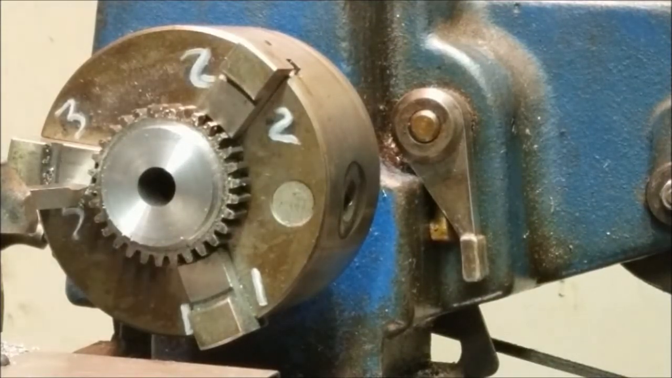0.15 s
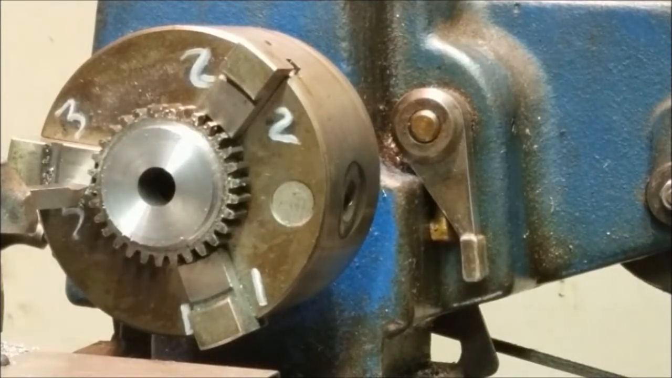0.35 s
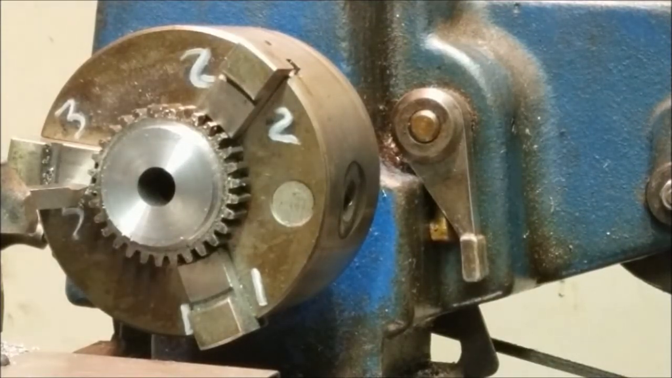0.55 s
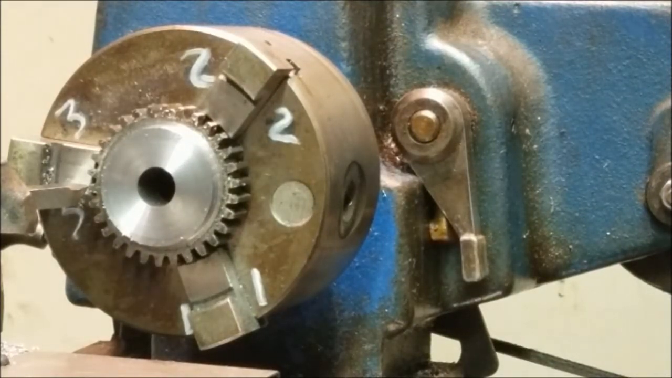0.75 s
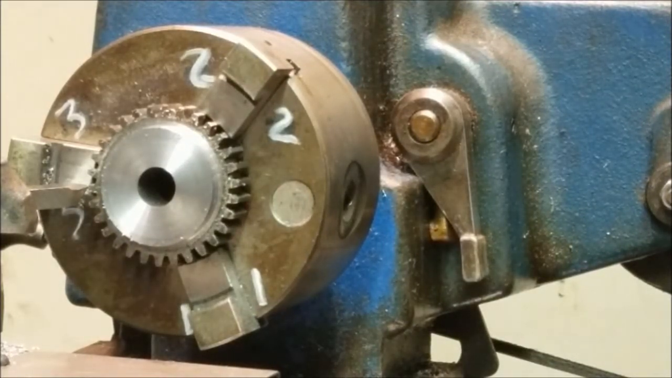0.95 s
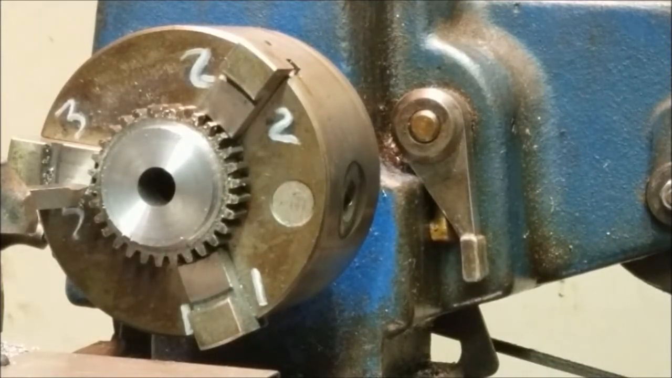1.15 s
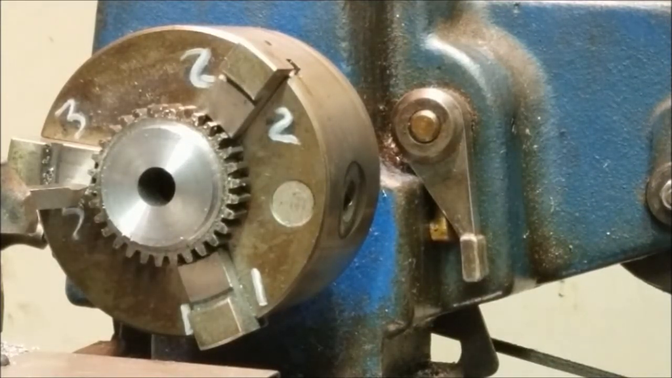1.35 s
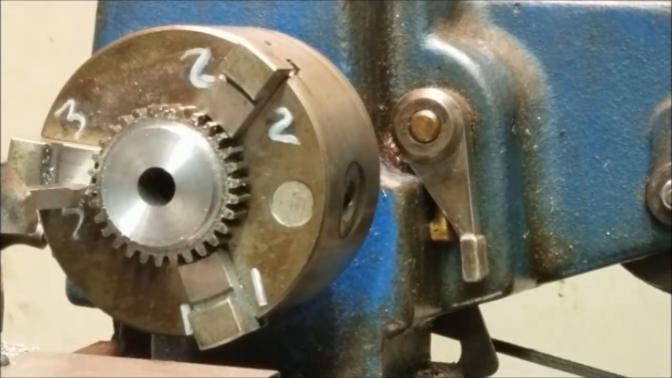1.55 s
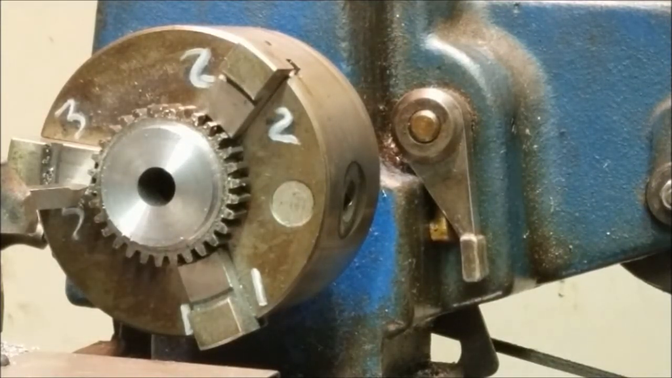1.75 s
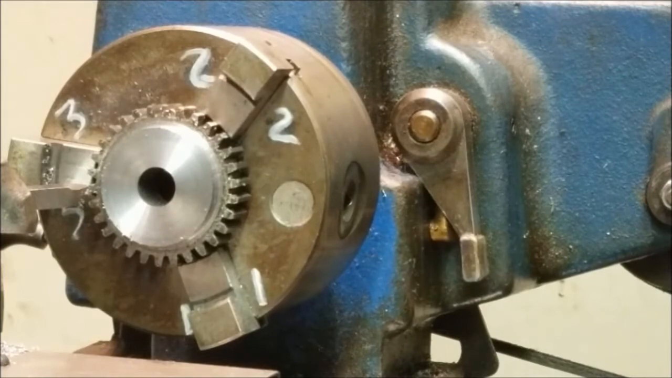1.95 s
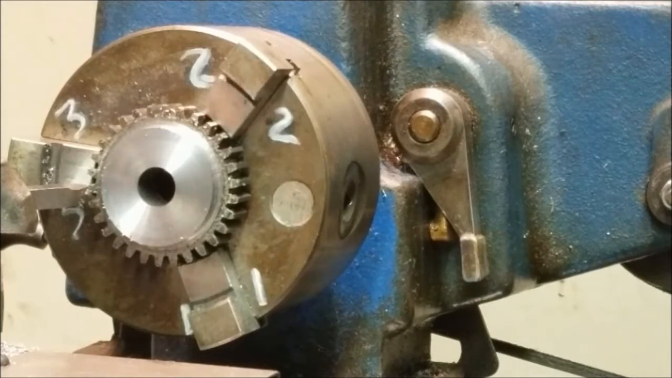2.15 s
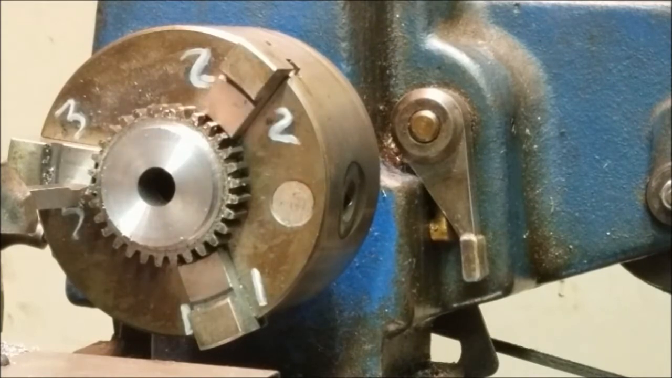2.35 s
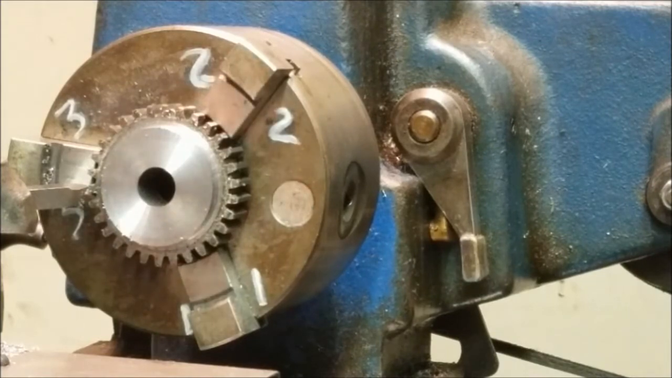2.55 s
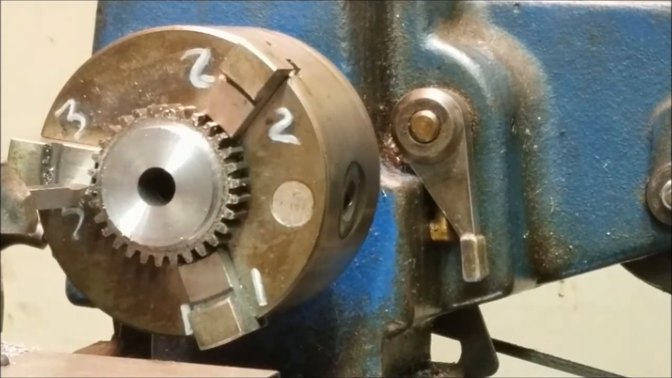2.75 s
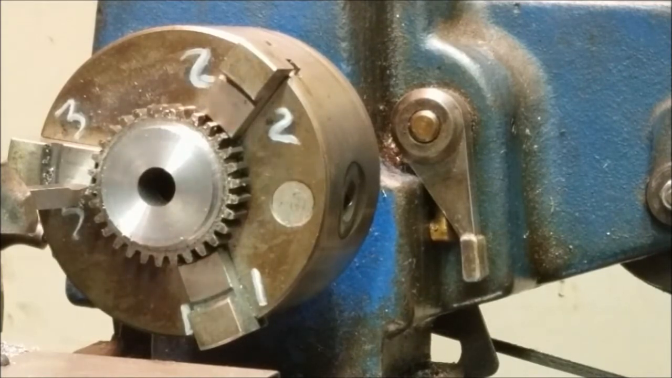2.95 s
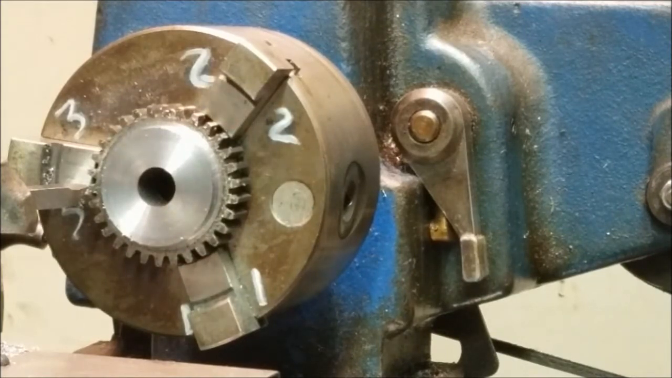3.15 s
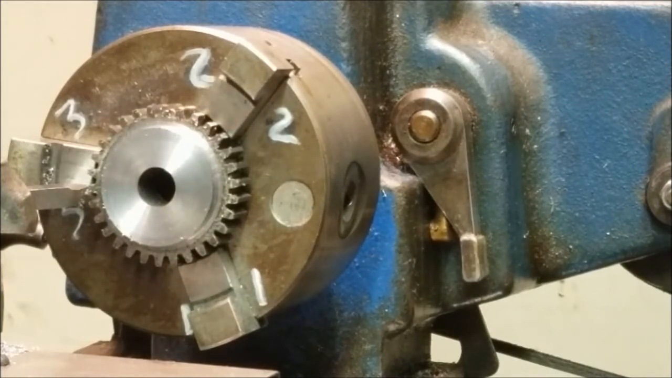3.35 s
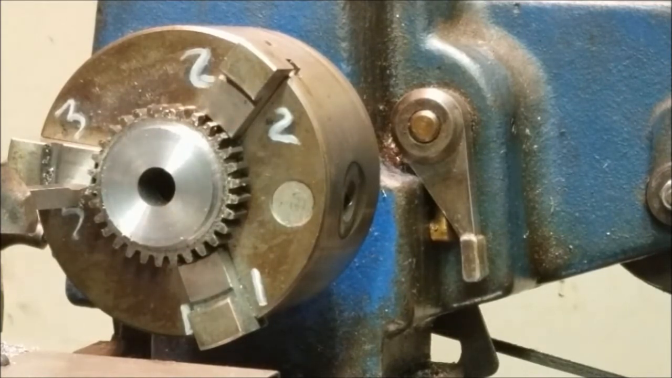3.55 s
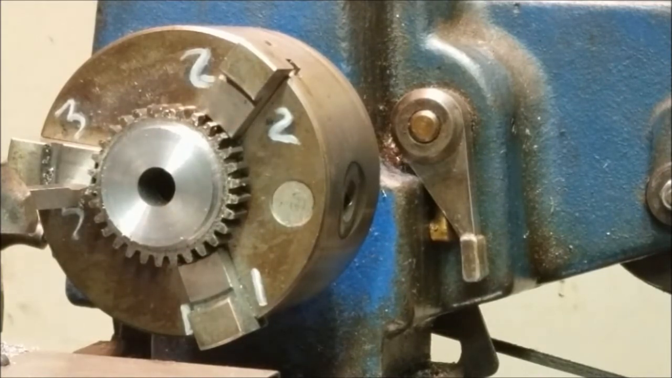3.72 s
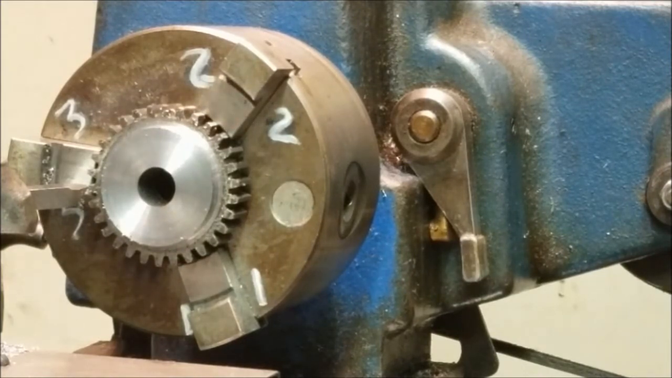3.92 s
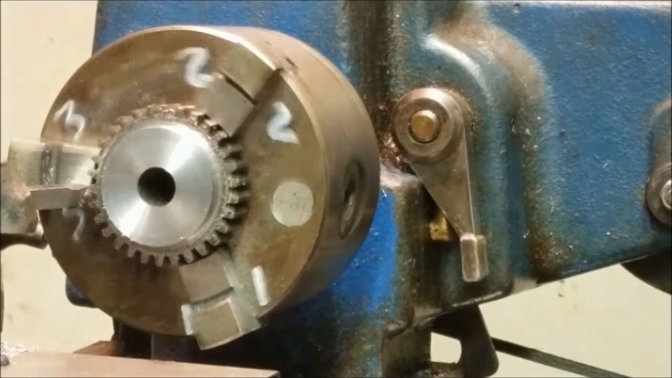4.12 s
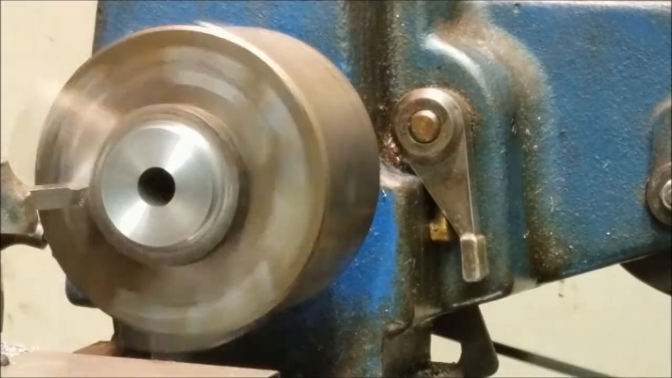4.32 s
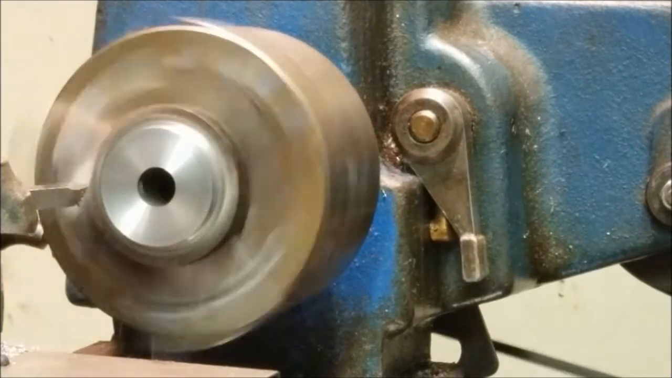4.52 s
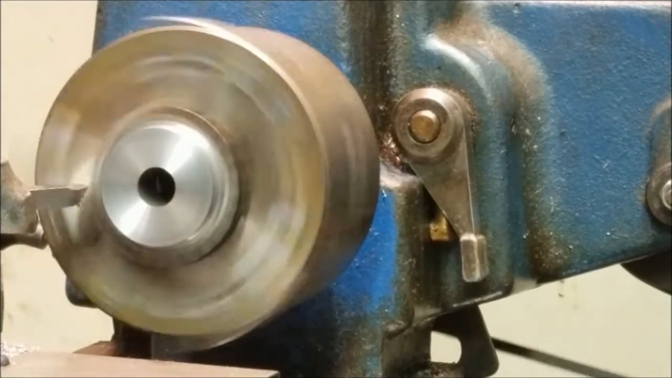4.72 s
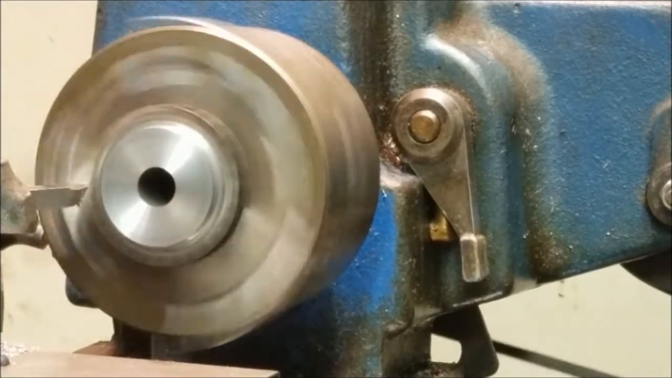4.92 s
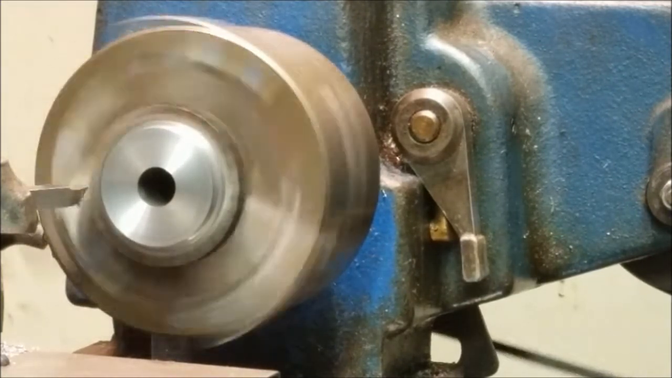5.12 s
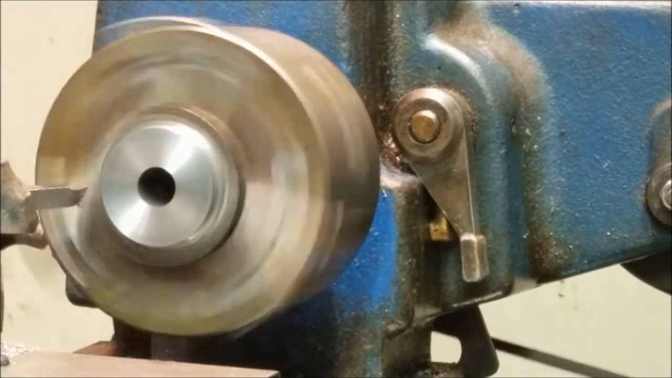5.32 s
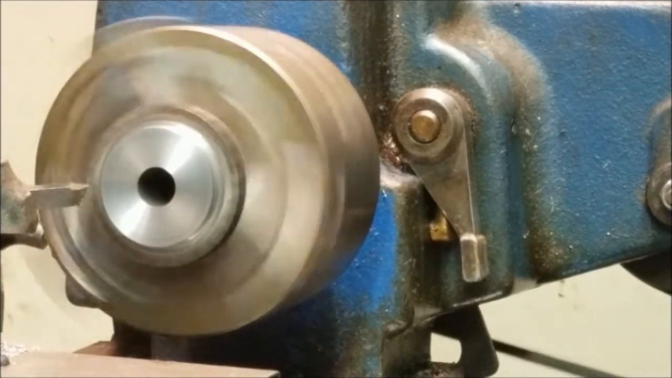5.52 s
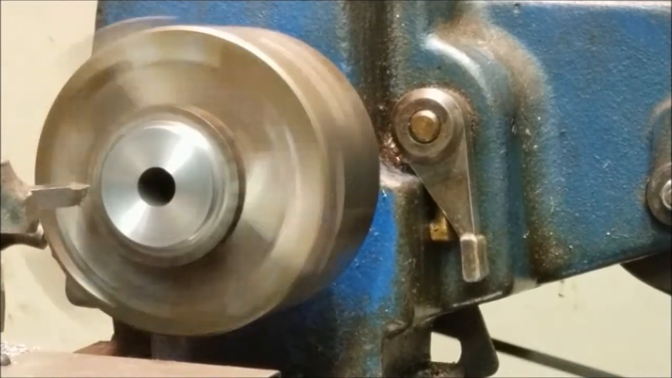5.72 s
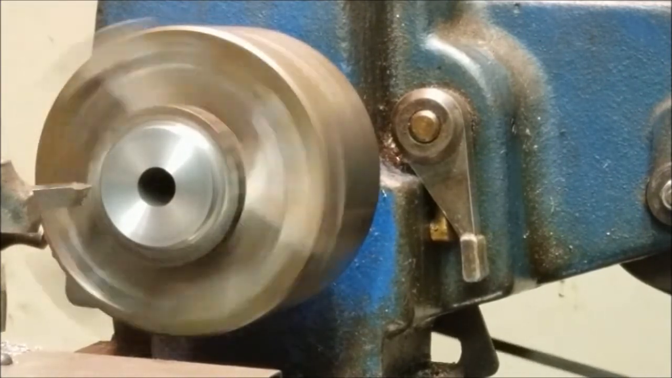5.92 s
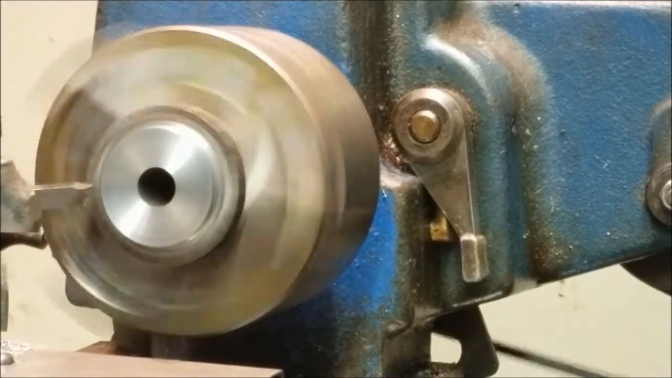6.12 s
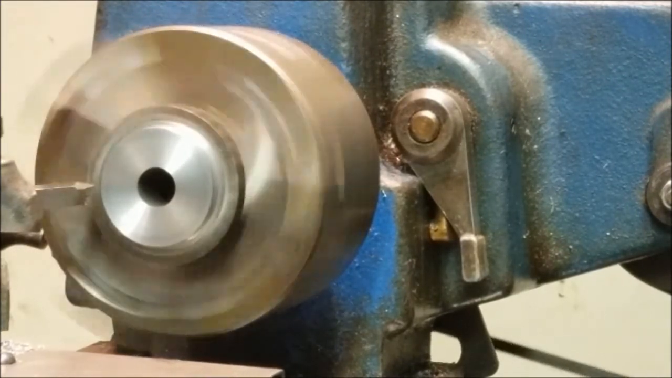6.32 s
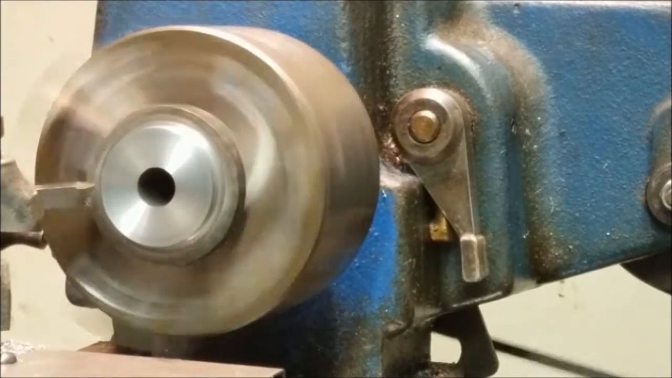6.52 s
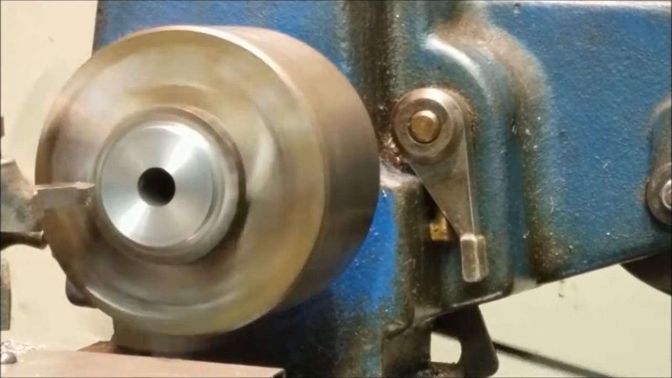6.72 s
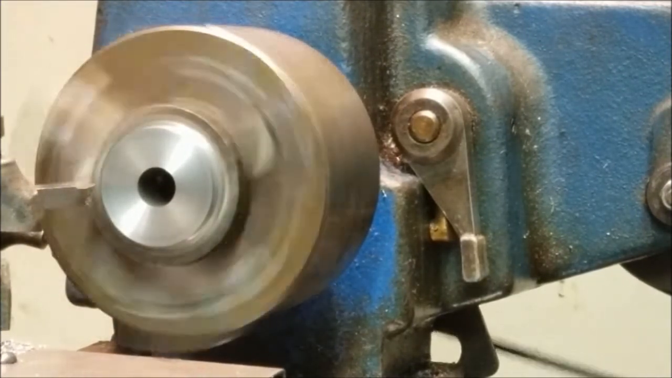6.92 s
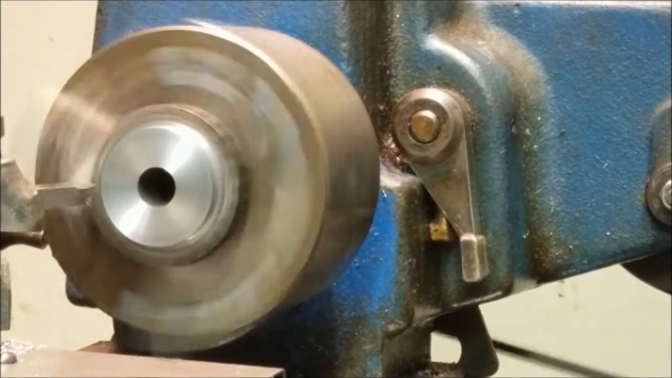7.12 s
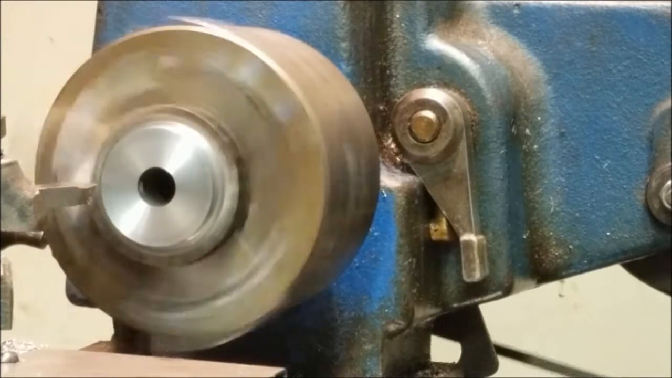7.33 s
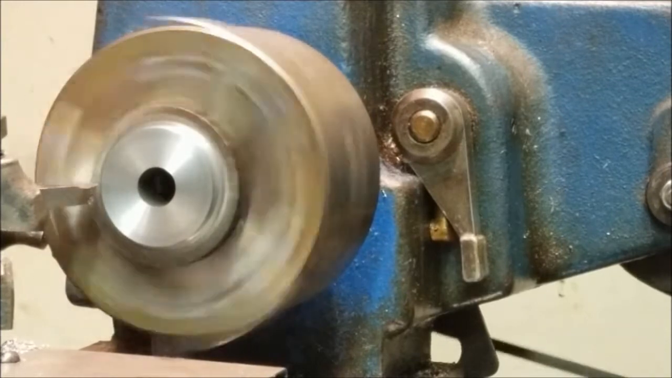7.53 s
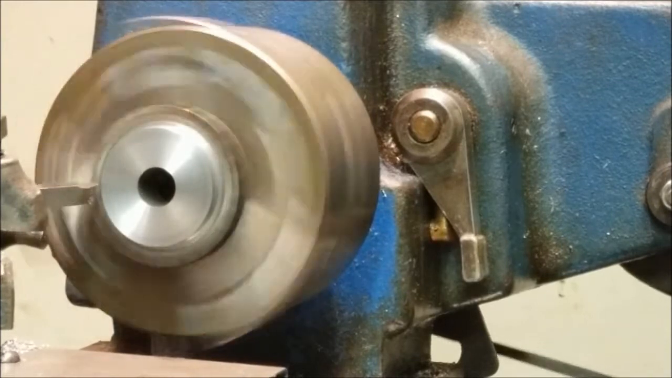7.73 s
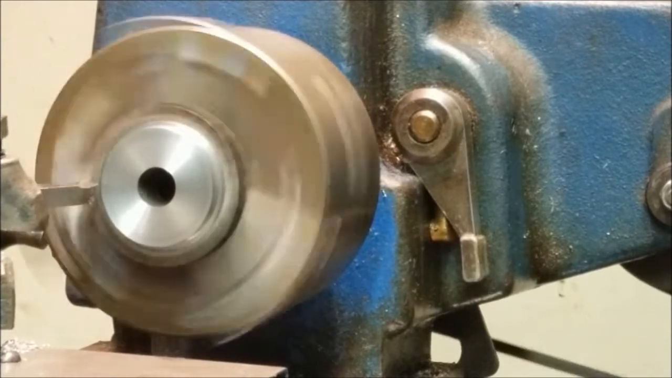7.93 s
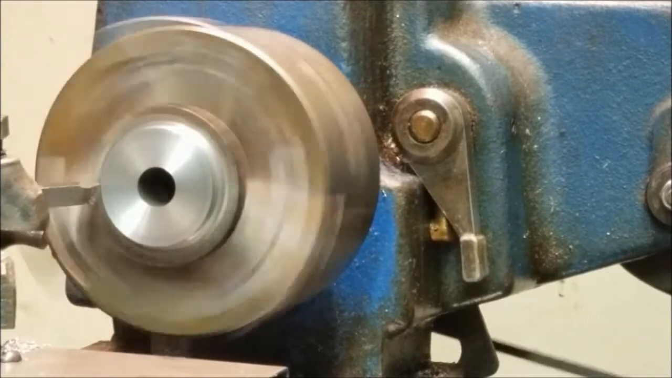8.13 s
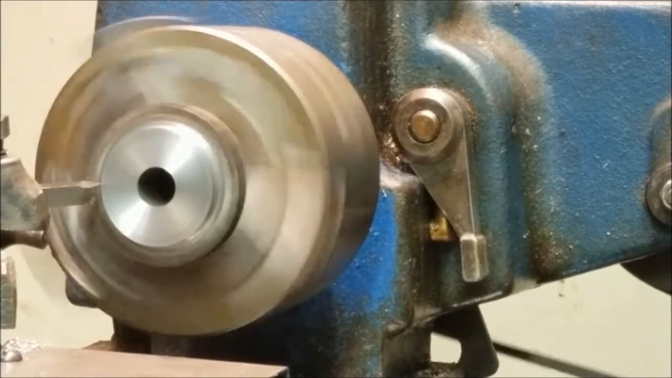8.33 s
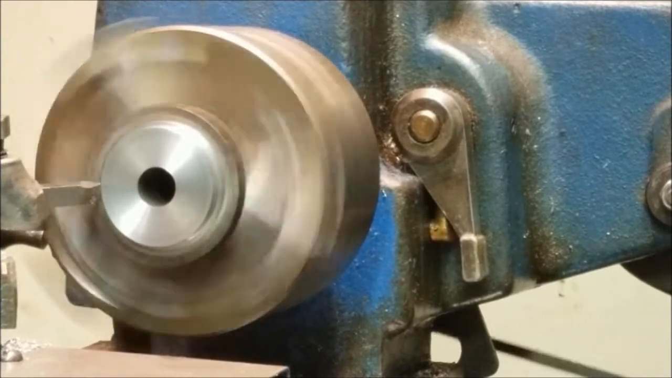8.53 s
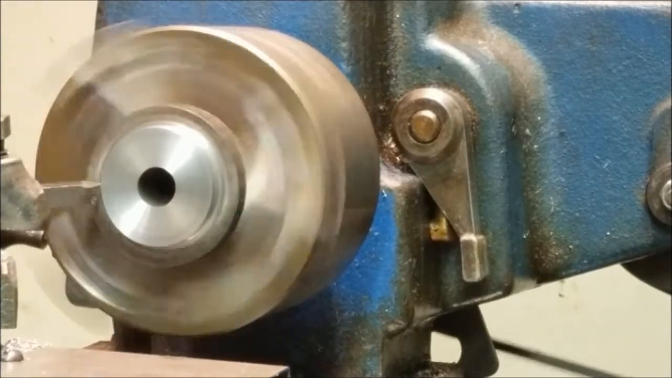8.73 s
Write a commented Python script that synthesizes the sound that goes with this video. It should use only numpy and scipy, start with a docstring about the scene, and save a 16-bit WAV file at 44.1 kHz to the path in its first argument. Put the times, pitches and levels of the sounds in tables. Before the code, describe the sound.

Faint metallic rubs and lever clinks in a quiet workshop, then a hard switch snap and a lathe motor growls up into a strong steady low hum.

```python
"""Faint rubs, scrapes and clinks first: the controls of a metal lathe are handled, close by in a small workshop.
The switch snaps, the induction motor growls up to speed and its starting switch clicks out.
It runs on: strong hum at twice mains frequency, slot whine, belt rumble and hiss, light uneven ticks.
Tonal parts are sums of wandering sines; rough parts are coloured noise under timed envelopes;
the lever rings as a bank of resonances."""
import sys
import numpy as np
from scipy import signal
from scipy.fft import rfft, irfft, next_fast_len
from scipy.io import wavfile
from scipy.ndimage import uniform_filter1d, map_coordinates

SR = 44100
rng = np.random.default_rng(int(sys.argv[2]) if len(sys.argv) > 2 else 0)


def generate_wav(sig):
    """Save sig (samples, or channels by samples) to the path in sys.argv[1] as 16-bit PCM at SR."""
    pcm = np.round(np.clip(np.atleast_2d(sig).T, -1, 1) * 32767).astype(np.int16)
    wavfile.write(sys.argv[1], SR, pcm)


N = 391166

# All table levels are relative; spectra are density/dB (per Hz), scaled to rms 1 before use.
# quiet workshop spectrum: f/Hz, density/dB
QUIET_SPECTRUM = [(13, -35.5), (22, -6.5), (102, -1.5), (192, -14), (260, -24), (298, -17), (333, -28),
                  (758, -27.5), (823, -25), (1020, -30), (1870, -29), (2400, -33.5), (3240, -36),
                  (3620, -42), (15500, -38.5)]
# electrical hum in the room: f/Hz, level/dB
ROOM_TONES = [(120, -76.5), (840, -87.5), (1200, -90), (1922, -93.5), (2040, -91.5)]
# left-right likeness of noise: f/Hz, correlation/1
LIKENESS = [(100, 0.96), (300, 1), (700, 0.9), (1500, 0.74), (3000, 0.88), (6000, 0.9), (12000, 0.92)]
# workshop decay: f/Hz, t60/s
ROOM_T60 = [(200, 0.73), (1000, 0.38), (4000, 0.34), (8000, .3), (15000, 0.12)]

# light rubs of sliding parts: t/s, length/s, level/dB
RUBS = [(0.323, 0.18, -65.5), (0.569, .1, -64.5), (1.09, 0.1, -68), (1.22, 0.092, -67), (1.823, .09, -69),
        (1.96, 0.043, -70.5), (3.548, 0.22, -85.5)]
# soft knocks as the hand takes hold: t/s, level/dB
KNOCKS = [(.338, -64), (.378, -64.5)]
# short lever scrapes: t/s, length/s, level/dB, dull body re scrape/dB
SCRAPES = [(1.316, 0.04, -48, -30), (1.358, 0.032, -56, -21), (1.719, 0.063, -57, -1),
           (2.353, 0.068, -56.5, -10.5), (2.416, 0.083, -61.5, -8.5), (2.59, 0.089, -58, -8.5),
           (2.661, 0.052, -49, -3), (2.888, 0.052, -57, -1.5)]
# rub, scrape, dull body and knocked casting spectra: f/Hz, density/dB
RUB_SPECTRUM = [(350, -36), (600, -7.5), (852, -7.5), (1040, -12), (1160, -5), (2680, -3), (7750, -9.5),
                (9360, -20.5), (15000, -16)]
SCRAPE_SPECTRUM = [(350, -45.5), (600, -7), (669, -11.5), (1200, -2), (1690, -3.5), (2370, -0.5),
                   (3160, -5), (6760, -4), (8870, -12.5), (11600, -13), (15500, -16)]
BODY_SPECTRUM = [(100, -2), (200, -8.5), (480, -2), (800, -2.5), (2000, -13.5), (6000, -53)]
CASTING_SPECTRUM = [(450, -35), (720, -7), (850, 3.5), (1020, -1.5), (1400, -17.5), (5000, -18.5)]
# lever knocks home: t/s, level/dB
CLINKS = [(1.106, -68), (1.9775, -59.5), (2.647, -43.5), (2.6636, -34.5), (2.6695, -32), (2.6848, -32),
          (2.6905, -42), (2.70, -45.5), (2.8998, -52)]
# lever modes: f/Hz, width/Hz, level/dB
LEVER_MODES = [(840, 32, -1), (1320, 16, 8.5), (1490, 33, -3.5), (2300, 230, 8), (4000, 45, 7.5),
               (6400, 51, -16.5), (8340, 250, -8.5), (8700, 140, -17), (11700, 42, -28),
               (12500, 150, -33.5)]

# snaps of power and starting switches: t/s, level/dB
SNAPS = [(4.025, -55.5), (4.030, -42.5), (4.0458, -18.5), (4.211, -26.5), (4.217, -30)]
# switch parts rattling after each snap: t/s, level/dB
RATTLES = [(4.048, -42.5), (4.211, -32.5)]
# snap and rattle spectra: f/Hz, density/dB
SNAP_SPECTRUM = [(300, -33), (720, -3), (1020, -13.5), (1640, -11), (2200, -10), (2800, -1.5), (4300, -1),
                 (5600, -6.5), (7500, -9), (9500, -21.5), (11300, -11.5), (15500, -20.5)]
RATTLE_SPECTRUM = [(800, -3), (2000, 1.5), (3100, 3.5), (4500, -13), (8200, -6), (10000, -23),
                   (15500, -12.5)]
# frame resonances passed during run-up: t/s, width/s, f/Hz, level/dB
RUN_UP_RESONANCES = [(4.088, .014, 195, -45), (4.118, .012, 210, -39), (4.168, .018, 495, -36),
                     (4.186, .016, 850, -37.5)]
# slipping belt, frame lurching on its feet: f/Hz, density/dB
SQUEAL_SPECTRUM = [(4000, -30), (5800, -12), (6500, 0), (7100, -8), (7600, -4), (9000, -15), (12000, -14),
                   (13500, -7), (15500, -16)]
LURCH_SPECTRUM = [(25, -22), (55, 0), (120, -15.5), (400, -80)]

# hardest ticks of the running drive: t/s, level/dB, duller clack re tick/dB
HARD_TICKS = [(4.305, -45, 0), (4.417, -42, -9), (4.5, -55, 7), (4.562, -44.5, -1.5), (4.711, -41, -8.5),
              (5.029, -44.5, -5.5), (5.77, -43.5, -6.5), (6.05, -44.5, -2.5), (6.169, -45, -5),
              (6.945, -44, -4), (7.213, -36, -9.5), (7.385, -53, 6), (7.802, -48.5, -2.5),
              (7.934, -42, -7.5), (8.087, -43, -7), (8.37, -46.5, -10.5), (8.847, -35.5, -8)]
# tick and clack spectra: f/Hz, density/dB
TICK_SPECTRUM = [(2500, -20), (4300, -6), (5300, -0.5), (6500, -11.5), (8300, 0.5), (9000, -5),
                 (9600, -21.5), (11000, -21.5), (11900, -6), (13300, -18.5), (15500, -25)]
CLACK_SPECTRUM = [(800, -22), (1700, -3), (2550, 3), (3100, -1.5), (3600, -5.5), (4300, -10), (5300, -12),
                  (8000, -28)]
# rumble, belt and hiss of the drive: f/Hz, density/dB
RUMBLE_SPECTRUM = [(20, -22), (45, -21.5), (70, -15), (95, -1), (140, -1), (200, -7.5), (260, -9.5),
                   (340, -17.5), (500, -37.5), (900, -80)]
BELT_SPECTRUM = [(150, -34.5), (280, -5), (370, 0), (540, 2), (680, -6), (860, -4), (1000, -7.5),
                 (1280, -6), (1700, -12.5), (2300, -32.5), (5000, -64.5)]
HISS_SPECTRUM = [(1000, -33.5), (1700, -2.5), (1850, -6.5), (2050, 1), (2300, -3.5), (2700, 1),
                 (3020, -5.5), (4370, -7), (4970, -12), (6700, -14), (7400, -11.5), (8600, -17),
                 (9400, -22), (11000, -21), (11700, -16.5), (12400, -22), (12900, -22), (13600, -28.5),
                 (15500, -30.5)]
# hum overtones: multiple/1, level/dB
OVERTONES = [(3, -0.5), (4, -5), (5, -10.5), (6, -12.5), (7, -10), (8, -20.5), (9, -21), (10, -17),
             (11, -20.5)]
# steady tones: f/Hz, level/dB
STEADY_TONES = [(59.5, -62), (89.3, -54.5), (165, -57), (193, -56.5), (221, -58.5), (239.9, -50.5),
                (843, -60.5), (1129, -64), (1199, -64), (1309, -69), (2024, -74), (2649, -78)]
# rotor slot whine: multiple/1, level/dB, phase swing/rad
SLOT_TONES = [(1, -67, 1.4), (3, -75, 0.44), (5, -83.5, 1.7), (6, -79.5, 1.1), (7, -78, .9),
              (8, -83.5, 2.2), (9, -85.5, 1.8)]

RUB_ATTACK_S, RUB_RELEASE_S = 0.04, 0.058
PING_S, PING_HZ, PING_DB = 2.6848, 4075, -46  # the lever's hardest blow sets one mode singing
# power comes on, the starting switch cuts out, the rotor overshoots and locks
POWER_ON_S, CUT_OUT_S, PULL_IN_S = 4.046, 4.215, 4.253
SETTLE_S, RUN_IN_S = 0.11, 1.3  # from cut-out: strain dies away, running noise fills out
HUM_HZ, SLOT_HZ = 119.96, 1427.8
HUM_DB, HUM_DELAY_S, HUM_RISE_S = -18, 0.14, 0.017  # run-in level; build-up after power-on
# hum swells and throbs as the rotor pulls in
SURGE_DB, SURGE_WIDTH_S, THROB_DB, THROB_HZ = 4.5, 0.084, 3, 17
# the drive drags once for a moment
DRAG_S, DRAG_LENGTH_S, DRAG_ATTACK_S, DRAG_RELEASE_S = 5.84, 0.74, 0.18, 0.055
# later light ticks, about one per chuck turn
LIGHT_TICKS_FROM_S, TURN_S, TICK_SCATTER_S = 5.9, 0.146, 0.012
LIGHT_TICK_DB, LIGHT_CLACK_DB, TICK_SCATTER_DB = -53, 1.5, 2.1
SKEW_HZ, SKEW_OCTAVES = 4800, 0.97  # centre and spread of off-axis phase lead
TOP_HZ = 15800


def amp(db):
    """Decibels to gain."""
    return 10 ** (np.asarray(db) / 20)


def unit(x):
    """Scale to rms 1."""
    return x / np.sqrt(np.mean(x ** 2) + 1e-20)


def clock():
    """Time of each sample, s."""
    return np.arange(N) / SR


def along(points, hz):
    """Interpolate (Hz, value) points on a log frequency axis."""
    f, v = np.transpose(points)
    return np.interp(np.log(hz + 1), np.log(f + 1), v)


def wobble(rate_hz):
    """Smooth random curve, rate_hz knots a second."""
    knots = rng.standard_normal(int(N * rate_hz / SR) + 4)
    return map_coordinates(knots, [clock() * rate_hz])


def filtered(x, response):
    """Apply a response given as a function of frequency."""
    m = next_fast_len(N + SR // 2)
    spectrum = rfft(x, m) * response(np.fft.rfftfreq(m, 1 / SR))
    return irfft(spectrum, m)[..., :N]


def rush(spectrum):
    """Coloured stereo noise of rms 1; mid/side balance sets the left-right likeness."""
    def mid_side_gain(hz):
        angle = np.arccos(np.clip(along(LIKENESS, hz), -1, 1)) / 2
        return amp(along(spectrum, hz)) * [np.cos(angle), np.sin(angle)]

    mid, side = filtered(rng.standard_normal((2, N)), mid_side_gain)
    return unit(np.array([mid + side, mid - side]))


def tone(hz, drift_rad):
    """Sine of rms 1 whose phase wanders on a scale of drift_rad."""
    return np.sqrt(2) * np.sin(2 * np.pi * (hz * clock() + rng.random()) + drift_rad * wobble(5))


def blows(rows, t60_s):
    """Envelope that jumps at each (s, dB) row and decays exponentially."""
    hits = np.zeros(N)
    for s, db in rows:
        hits[min(round(s * SR), N - 1)] += amp(db)
    decay = np.exp(-np.log(1000) / (t60_s * SR))
    return signal.lfilter([1], [1, -decay], hits)


def stroke(start_s, length_s, attack_s, release_s):
    """Envelope that rises, holds and dies away."""
    t = clock() - start_s
    return np.clip(t / attack_s, 0, 1) * np.exp(-np.maximum(t - length_s, 0) / release_s)


def burst(centre_s, width_s):
    """Gaussian bump around a moment."""
    return np.exp(-((clock() - centre_s) / width_s) ** 2)


def build_up(delay_s, rise_s):
    """Gain climbing smoothly to 1, half way delay_s after power-on."""
    t = clock() - POWER_ON_S
    return (t > 0) * (1 + np.tanh((t - delay_s) / (2 * rise_s))) / 2


def effort(strain_db, run_in_db, drag_db):
    """Gain of a running part: offsets for starting strain, run-in and the moment of drag."""
    running_s = np.maximum(clock() - CUT_OUT_S, 0)
    strain = np.exp(-running_s / SETTLE_S)
    fresh = np.exp(-(running_s / RUN_IN_S) ** 2)
    drag = stroke(DRAG_S, DRAG_LENGTH_S, DRAG_ATTACK_S, DRAG_RELEASE_S)
    return amp(strain_db * strain + run_in_db * fresh + drag_db * drag)


def patchy(x, depth_db):
    """Vary the colour of x from moment to moment; rms 1."""
    z = signal.stft(x, nperseg=512)[2]
    field = rng.standard_normal(z.shape[1:])
    field = uniform_filter1d(field, size=4, axis=0)  # across frequency
    field = uniform_filter1d(field, size=9, axis=1)  # across time
    return unit(signal.istft(z * amp(depth_db * unit(field)), nperseg=512)[1][:, :N])


def in_room(x, wet_db):
    """Add the workshop's reverberation: decaying noise tails, delayed 4 ms, as mid and side."""
    hz, t, z = signal.stft(rng.standard_normal((2, SR // 2)), SR, nperseg=256)
    decay = amp(-60 * t / along(ROOM_T60, hz)[:, None])
    tail = signal.istft(z * decay, SR, nperseg=256)[1]
    late = np.pad(x.mean(axis=0), (SR // 250, 0))[None]
    mid, side = signal.fftconvolve(late, tail / np.linalg.norm(tail[0]), axes=1)[:, :N]
    # long waves reach both ears alike
    side = filtered(side, lambda hz: 0.45 * hz / np.hypot(hz, 1200))
    return x + amp(wet_db) * np.array([mid + side, mid - side])


def off_axis(x, lead_rad, pan_db):
    """Source to one side: left leads in phase, most at SKEW_HZ, and is louder by pan_db."""
    ears = np.array([[0.5], [-0.5]])

    def response(hz):
        skew = lead_rad * np.exp(-(np.log2((hz + 1) / SKEW_HZ) / SKEW_OCTAVES) ** 2)
        return amp(pan_db * ears) * np.exp(1j * ears * skew)

    return filtered(x, response)


def floor():
    """Quiet workshop: coloured noise and a faint electrical hum."""
    hum = sum(amp(db) * tone(hz, drift_rad=0.61) for hz, db in ROOM_TONES)
    return amp(-68) * rush(QUIET_SPECTRUM) + hum


def handling():
    """Steel slides on steel in tiny slips; scrapes also stir the casting; soft knocks near the start."""
    t = clock()
    rub = sum(amp(db) * stroke(s, length, RUB_ATTACK_S, RUB_RELEASE_S) for s, length, db in RUBS)
    scrape, body = np.zeros(N), np.zeros(N)
    for s, length, db, body_db in SCRAPES:
        times_s = [s, s + 0.018, s + length, s + length + 0.021]
        # end values hold outside the scrape: a very faint constant rub
        push = amp(db) * np.interp(t, times_s, [0.0034, 0.98, 0.5, 0.0035])
        scrape += push
        body += push * amp(body_db)
    knock = blows(KNOCKS, t60_s=0.15) * rush(CASTING_SPECTRUM)
    slips = unit(amp(2 * wobble(350) + 2.7 * wobble(2000)))
    rubbing = amp(-2.0) * rub * rush(RUB_SPECTRUM)
    scraping = amp(1.0) * scrape * rush(SCRAPE_SPECTRUM)
    stirred = body * rush(BODY_SPECTRUM)
    return in_room(knock + slips * (rubbing + scraping + stirred), wet_db=-6)


def lever():
    """A lever knocks and bounces; each contact excites its steel modes."""
    def modes(f):
        response = 0
        for k, (centre, width, db) in enumerate(LEVER_MODES):
            damping = 1j * f * width
            response = response + (-1) ** k * amp(db) * damping / (centre * centre - f * f + damping)
        return response

    contact = blows(CLINKS, t60_s=0.0083) * rng.standard_normal(N)
    crack = blows(CLINKS, t60_s=0.019) * rush(SCRAPE_SPECTRUM)
    ping = blows([(PING_S, PING_DB)], t60_s=0.17) * tone(PING_HZ, drift_rad=0.42)
    ring = in_room(amp(14.5) * filtered(contact, modes)[None], wet_db=-11)
    return off_axis(ring + in_room(amp(-3.5) * crack, wet_db=-4) + ping, lead_rad=0.5, pan_db=0.0)


def switches():
    """Sprung contacts snap hard; their parts rattle briefly."""
    snap = blows(SNAPS, t60_s=0.014) * rush(SNAP_SPECTRUM)
    rattle = blows(RATTLES, t60_s=0.2) * unit(amp(1.3 * wobble(500))) * rush(RATTLE_SPECTRUM)
    return off_axis(in_room(snap, wet_db=-15.5) + rattle, lead_rad=-0.7, pan_db=-0.5)


def run_up():
    """The gathering rotor growls up through frame resonances; belt squeals thinly, machine lurches."""
    sweep = sum(amp(db) * burst(s, width) * tone(hz, drift_rad=0.5)
                for s, width, hz, db in RUN_UP_RESONANCES)
    torque = 1 + 0.6 * np.cos(2 * np.pi * HUM_HZ * clock())
    low_growl = amp(-49.0) * build_up(delay_s=0.056, rise_s=0.005) * burst(4.14, 0.06) * rush(BELT_SPECTRUM)
    high_growl = amp(-42.5) * burst(4.19, 0.055) * rush(CASTING_SPECTRUM)
    lurch = amp(-42.5) * burst(PULL_IN_S, 0.07) * rush(LURCH_SPECTRUM)
    squeal = amp(-45.5) * burst(4.187, 0.027) * rush(SQUEAL_SPECTRUM)
    return sweep + torque * (low_growl + high_growl) + lurch + squeal


def ticks():
    """Loose drive parts touch about once a turn, now and then hard: bright chatter over a duller clack."""
    turns_s = np.arange(LIGHT_TICKS_FROM_S, N / SR, TURN_S)
    touches = list(HARD_TICKS)
    for s, (late, force) in zip(turns_s, rng.standard_normal((len(turns_s), 2))):
        level_db = LIGHT_TICK_DB + TICK_SCATTER_DB * force
        touches.append((s + TICK_SCATTER_S * late, level_db, LIGHT_CLACK_DB))
    chatter = unit(amp(1.6 * wobble(400)))
    tick_env = blows([(s, db) for s, db, clack_db in touches], t60_s=0.09)
    clack_env = blows([(s, db + clack_db) for s, db, clack_db in touches], t60_s=0.059)
    bright = tick_env * patchy(rush(TICK_SPECTRUM), depth_db=3.5)
    dull = clack_env * patchy(rush(CLACK_SPECTRUM), depth_db=3.5)
    return in_room(chatter * (amp(-9.5) * bright + amp(-1.0) * dull), wet_db=-3.5)


def drive():
    """Belt and bearings rumble and hiss with the effort; hiss flutters with the motor's torque."""
    rumble = build_up(delay_s=0.077, rise_s=0.012) * effort(strain_db=12.5, run_in_db=-2.5, drag_db=1.5)
    belt = build_up(delay_s=0.125, rise_s=0.031) * effort(strain_db=16.5, run_in_db=-1.5, drag_db=2.5)
    hiss = build_up(delay_s=0.13, rise_s=0.012) * effort(strain_db=14, run_in_db=-2.0, drag_db=3.5)
    phase = 2 * np.pi * HUM_HZ * clock()
    torque = 1 + 0.096 * np.cos(phase) + 0.12 * np.cos(2 * phase)
    low = amp(-43.0 + 1.1 * wobble(9)) * rumble * rush(RUMBLE_SPECTRUM)
    middle = amp(-49.5 + 1.6 * wobble(25)) * belt * rush(BELT_SPECTRUM)
    grain = unit(amp(1.7 * wobble(40) + 2.0 * wobble(700)))
    high = amp(-58.0) * hiss * grain * torque * rush(HISS_SPECTRUM)
    return low + middle + in_room(high, wet_db=-7.5)


def motor():
    """The field shakes the frame twice per mains cycle; slot whine is swung by the pulsing torque."""
    t = clock()
    phase = 2 * np.pi * HUM_HZ * t + 0.018 * wobble(4.6)
    throb_db = THROB_DB * np.cos(2 * np.pi * THROB_HZ * (t - PULL_IN_S))
    surge_db = burst(PULL_IN_S, SURGE_WIDTH_S) * (SURGE_DB + throb_db)
    hum_gain = build_up(HUM_DELAY_S, HUM_RISE_S) * effort(strain_db=2.0, run_in_db=-1.33, drag_db=0)
    hum = amp(HUM_DB + surge_db) * hum_gain * np.sqrt(2) * np.sin(phase)
    casing = build_up(delay_s=0.092, rise_s=0.02) * effort(strain_db=14.5, run_in_db=-7, drag_db=9.0)
    buzz = casing * sum(amp(db + 2.5 * wobble(6)) * tone(k * HUM_HZ, drift_rad=0.65) for k, db in OVERTONES)
    whine = np.zeros(N)
    for k, db, swing_rad in SLOT_TONES:
        # swing gives sidebands spaced by the hum frequency
        swing = swing_rad * np.sin(phase + k)
        angle = 2 * np.pi * k * SLOT_HZ * t + swing + 0.97 * wobble(7.1) + 0.32 * wobble(60)
        whine += amp(db + 2.2 * wobble(4.8)) * np.sqrt(2) * np.sin(angle)
    tones = sum(amp(db + 2 * wobble(7)) * tone(hz, drift_rad=0.65) for hz, db in STEADY_TONES)
    up_to_speed = np.clip((t - 4.18) / 0.027, 0, 1)
    return hum + amp(-55.0) * buzz + up_to_speed * (whine + tones)


def scene():
    """Handling, switching on, running."""
    controls = handling() * amp([[-0.3], [0.3]]) + lever() + switches()
    return floor() + controls + run_up() + ticks() + drive() + motor()


def record(dry):
    """Remove everything from TOP_HZ up."""
    return filtered(dry, lambda hz: hz < TOP_HZ)


dry = scene()
out = record(dry)
generate_wav(out)
```